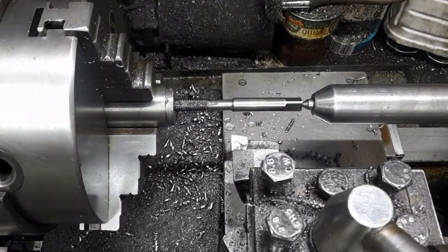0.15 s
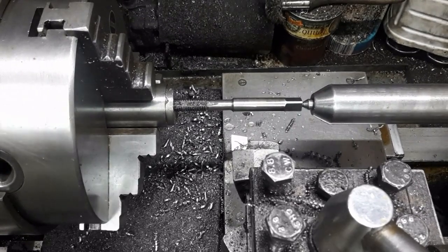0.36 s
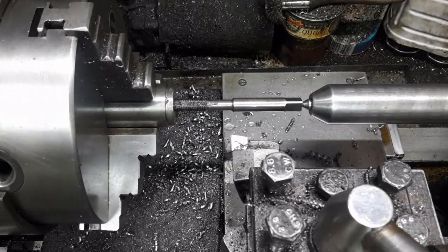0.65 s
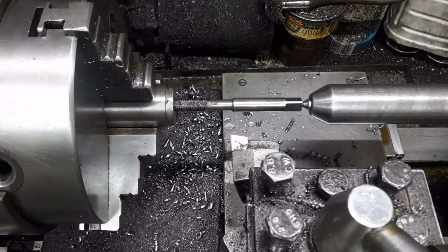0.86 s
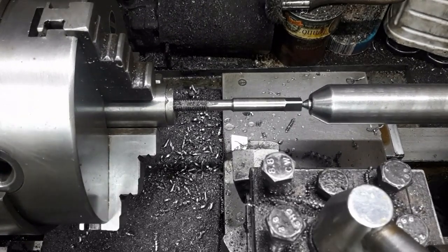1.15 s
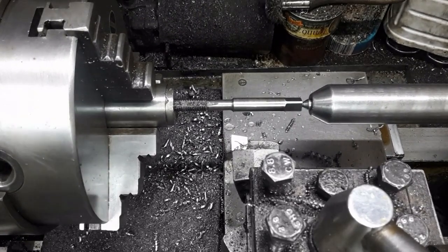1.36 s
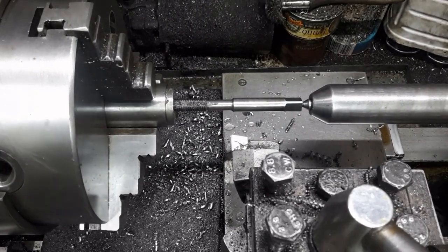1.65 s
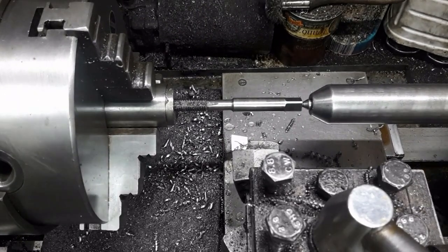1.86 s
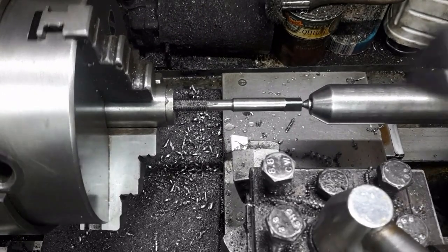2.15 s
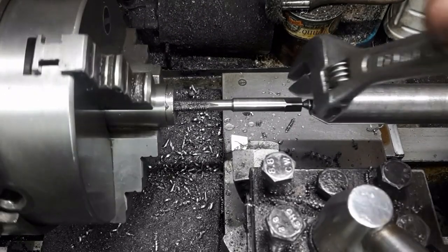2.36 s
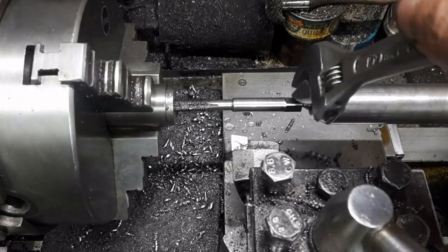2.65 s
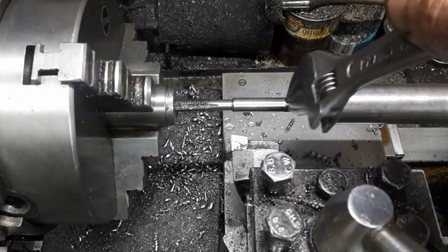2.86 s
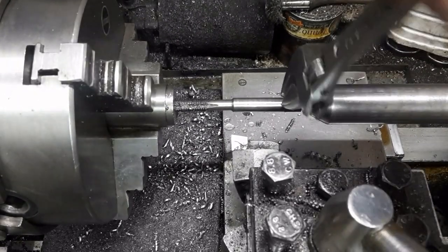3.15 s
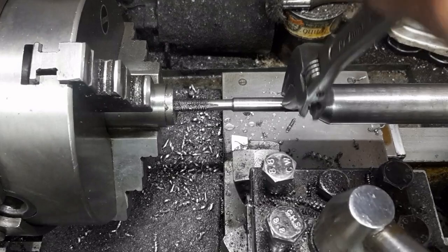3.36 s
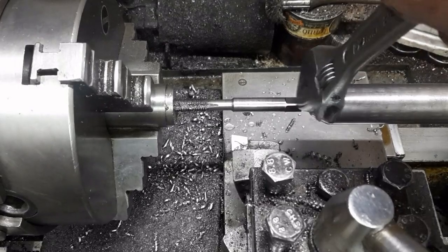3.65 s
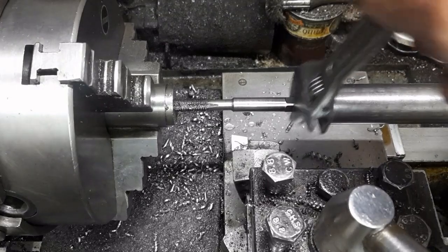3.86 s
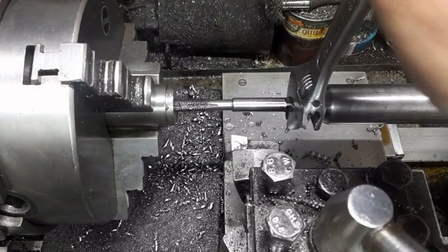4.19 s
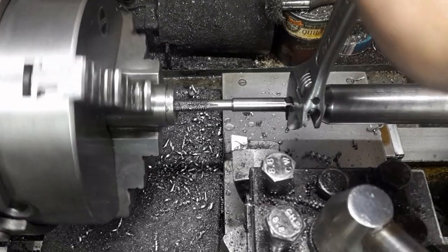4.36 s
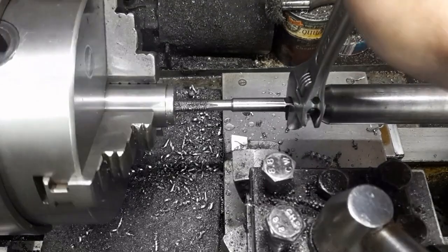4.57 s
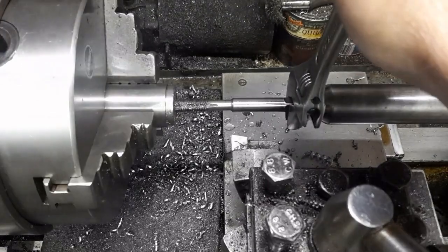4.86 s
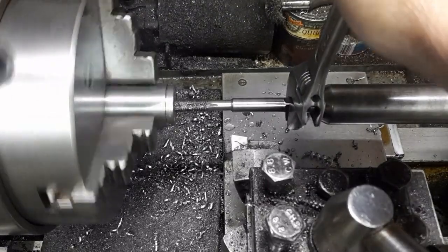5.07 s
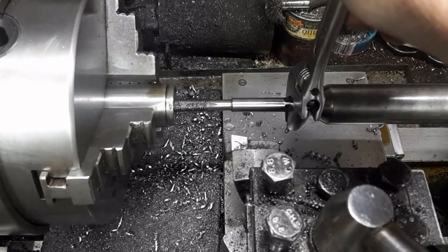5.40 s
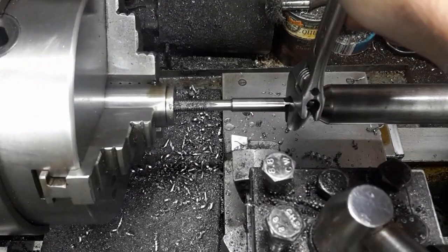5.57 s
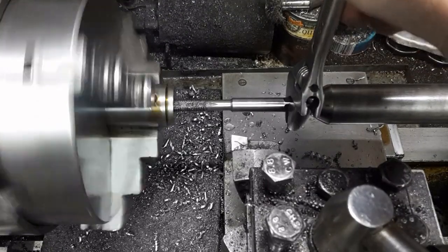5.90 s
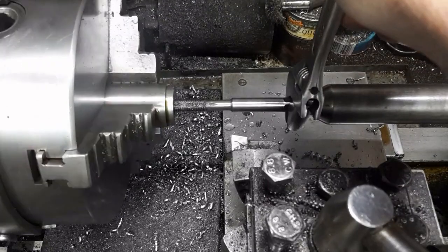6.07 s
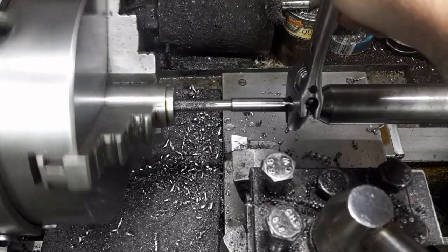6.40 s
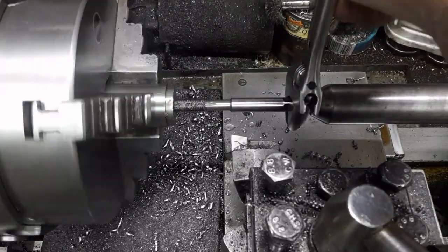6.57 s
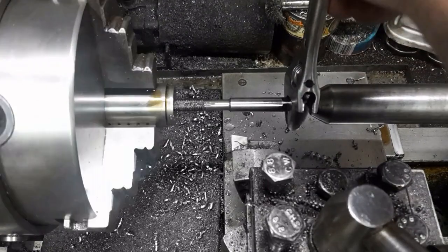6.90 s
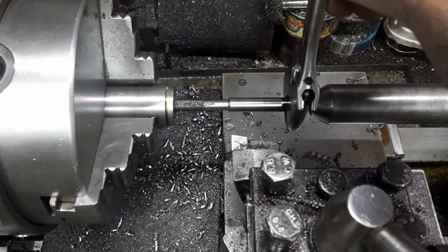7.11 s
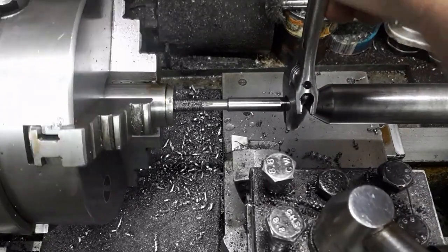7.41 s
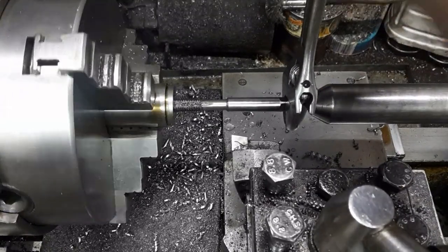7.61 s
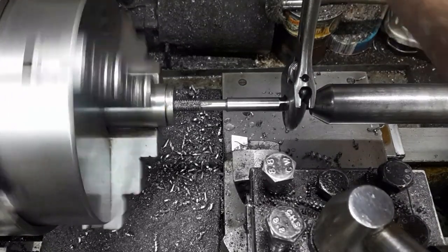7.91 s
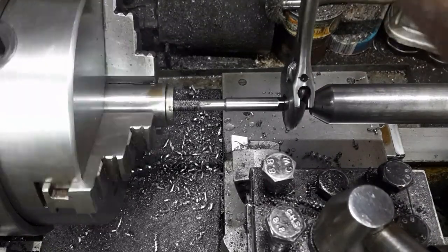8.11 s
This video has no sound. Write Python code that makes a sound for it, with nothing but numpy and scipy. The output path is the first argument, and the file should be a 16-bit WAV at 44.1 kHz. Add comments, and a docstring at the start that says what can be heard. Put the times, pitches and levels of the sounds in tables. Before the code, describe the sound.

A faint machine whirr sinks away, a wrench clinks and knocks onto steel, then rasping hand turns give way to a sped-up burst of swishes and ticks.

```python
"""In a workshop a thread is tapped by hand on a lathe, close to the microphone; most of the range leans left.
A whirr runs down, a wrench is fitted to the tap and knocks into place, then the chuck is pulled round by hand.
From 6.6 s time runs four times as fast: the pulls become quick swishes and ticks, higher in pitch.
Knocks are noise bursts in bands with ringing sine modes; whirr and squeal are noise in narrow resonances;
rasp, scrapes, hiss and room are coloured noise; groans, a faint low tone and hum are sine tones."""
import sys
import numpy as np
from scipy import signal
from scipy.fft import rfft, irfft
from scipy.io import wavfile
from scipy.ndimage import uniform_filter1d

SR = 44100
rng = np.random.default_rng(int(sys.argv[2]) if len(sys.argv) > 2 else 0)


def unload_wav(signal):
    """Save mono or channel-first audio to the path in sys.argv[1] as 16-bit WAV at rate SR, clipped to [-1, 1]."""
    wavfile.write(
        sys.argv[1],
        SR,
        np.round(np.clip(np.atleast_2d(signal).T, -1, 1) * 32767).astype(np.int16),
    )


N = 363825
TIME, BINS = np.arange(N) / SR, np.fft.rfftfreq(N, 1 / SR)  # s, Hz
FAST_FROM_S, FAST = 6.595, 4  # when time speeds up, and how many times
EDGE_HZ, SQUEAL_HZ = 16000, 3575  # top of the recorder's range; squeal at true speed

# Edges of the bass, middle, high and top band of a blow at true speed: [edge_hz]
BLOW_EDGES_HZ = [255, 850, 2000, 7500, 16500]
# Resonances of the chuck at true speed: [centre_hz, width_hz, lift_db]
CHUCK_RESONANCES = [(256, 25, 5.5), (890, 80, 7), (1533, 37, 11), (3420, 25, 7)]
# The drive running down: [time_s, pitch_hz, relative level_db]
RUN_DOWN = [(0, 1754, -51), (0.448, 1720, -49), (0.799, 1680, -50), (0.999, 1648, -56.5),
            (1.351, 1560, -57), (1.651, 1430, -55), (2.05, 1370, -61.5), (2.251, 1334, -72)]
# Likeness of left and right at true speed: [frequency_hz, correlation -1 to 1]
LIKENESS = [(60, 1), (150, 0.46), (300, 0.5), (700, 0.26), (1200, -0.42), (2500, 0.0081), (16000, 0)]


def wrench():
    """The wrench clinks, scrapes and knocks on the tap, and the chuck takes up its play."""
    # Light touches that set the tap ringing: [time_s, relative level_db, decay_s before the bass hold]
    clinks = [(1.6746, -35, 0.072), (1.7108, -43, 0.06), (1.7218, -42.5, 0.027), (2.6683, -56, .05),
              (2.7048, -51.5, 0.16), (2.9553, -51.5, 0.046)]
    # Knocks on the tap's square: [time_s, relative level_db, bass_db and middle_db against that level]
    knocks = [(2.6084, -39.5, -11, -13.5), (2.971, -44.5, -5, -19), (3.0391, -50, 5.5, -6),
              (3.1062, -35, -13, -13), (3.7973, -28, -9, -14), (4.005, -37, 4, -5), (4.0259, -37, -1, -8),
              (4.0297, -30.5, -13, -5), (4.6333, -39.5, -3.5, -8.5), (4.647, -45, -12, -5.5),
              (4.789, -49.5, -13, -14), (5.5792, -36.5, -14, -15)]
    # The chuck takes up its play: [time_s, relative level_db, bass_db against that level]
    clunks = [(5.1791, -42.5, -19), (5.3984, -47.5, -2.5), (5.884, -42.5, -21), (5.9647, -48, -20),
              (6.0923, -39, -3), (6.0984, -43, -25), (6.26, -51.5, -4)]
    # The wrench slides on the tap's square: [start_s, end_s, relative level_db]
    scrapes = [(.56, .6, -79), (1.55, 1.61, -55.5), (2.34, 2.39, -62), (2.615, 2.74, -56),
               (2.77, 2.82, -58.5), (2.93, 2.96, -56.5), (2.97, 3.07, -48), (3.06, 3.16, -54),
               (3.738, 3.8, -54), (3.955, 4.012, -54.5), (4.57, 4.63, -62)]
    # Colour of the scrape: [frequency_hz, relative level_db]
    scrape_colour = [(88, -43), (150, -8.5), (201, -17), (324, -9), (449, -11), (506, -15.5), (677, -9.5),
                     (1040, -21), (2100, -19), (2670, -20.5), (3450, -20.5), (5770, -24.5), (9000, -40),
                     (11700, -68), (19800, -120)]
    # Left minus right for the wrench: [frequency_hz, difference_db]
    wrench_sides = [(60, 1), (160, 15), (450, 5), (1200, 13.5), (2400, 10.5), (5500, 18), (7200, 14),
                    (9000, -6), (12000, -27), (16000, -14)]
    hard_db, brightening = -30, 3  # below a hard knock the top band loses this many dB per dB of force
    top_db, dull_db = -3, -17  # top band of a hard and of a soft knock

    blows = np.zeros((2, N))
    for s, db, t60 in clinks:
        add(blows, s + 0.00038, strike(db + np.array([-16, -14.0, -2.0, -21.5]), t60, ring_db=2))
    for s, db, bass_db, middle_db in knocks:
        knock_top_db = max(top_db + brightening * min(db - hard_db, 0), dull_db)
        bands_db = db + np.array([bass_db, middle_db, 0, knock_top_db])
        add(blows, s + .0005, strike(bands_db, t60=0.043, ring_db=-15))
    for s, db, bass_db in clunks:
        add(blows, s + 0.0006, strike(db + np.array([bass_db, 0, -7, -27]), t60=.036, ring_db=-3))
    scrape = evened(body(noise(scrape_colour, grit=0.37, grains_per_s=170), 1.0))
    scrape = scrape * strokes(scrapes, soft=0.32, swell_db=0)
    return ports(amp(25.0) * blows + amp(-1.5) * scrape, wrench_sides, LIKENESS)


def strike(bands_db, t60, ring_db):
    """Steel on steel: a blow with its low, middle, high and top band, and the ring of the tap."""
    knock = blow(bands_db, t60, 1, crack=2.3, rise=0.0012, room_db=-23, room_t60=0.16, bass_hold=200)
    return knock + amp(ring_db) * ring(bands_db)


def blow(bands_db, t60, speed, crack, rise, room_db, room_t60, bass_hold):
    """A crack, dense modes of heavy steel dying fast (bass slowest), and a room tail losing treble first."""
    t = np.arange(SR // 4 // speed) * speed / SR  # seconds at true speed
    sound = np.zeros((2, len(t)))
    for db, lo, hi in zip(bands_db, BLOW_EDGES_HZ, BLOW_EDGES_HZ[1:]):
        decay = max(t60, .01) * (1 + bass_hold / lo)
        modes = amp(-60 * t / decay)
        tail = amp(room_db - 60 * t / room_t60 * (0.5 + lo / 12000))
        shape = (crack * np.exp(-t / 0.00097) + modes + tail) * (1 - np.exp(-t / rise))
        band = signal.butter(6, [lo * speed, min(hi * speed, SR * .45)], "band", fs=SR, output="sos")
        burst = body(shape * rng.standard_normal((2, len(t))), speed, lo, hi)
        burst = signal.sosfilt(band, burst)
        sound += amp(db) * burst / np.linalg.norm(burst, axis=1, keepdims=True)
    return sound


def ring(bands_db):
    """The clear modes of tap and wrench, each as strong as the blow is in its band."""
    # Clear ring of the tap: [pitch_hz, level_db against the band, t60_s]
    steel_modes = [(2690, -3.5, 0.067), (3170, -1, 0.061), (3287, -5, 0.022), (5680, -6, 0.13),
                   (8400, -18, 0.12), (9500, -2, 0.025), (12300, -25, 0.055)]
    t = np.arange(SR // 4) / SR
    sound = np.zeros((2, len(t)))
    for hz, db, t60 in steel_modes:
        mode = amp(-60 * t / t60) * np.sin(2 * np.pi * (hz * t + rng.random((2, 1))))
        band_db = bands_db[np.searchsorted(BLOW_EDGES_HZ, hz) - 1]
        sound += amp(db + band_db) * mode / np.linalg.norm(mode[0])
    return sound


def body(x, speed, lo=0, hi=SR):
    """The heavy steel parts ring briefly at their resonances between lo and hi Hz of true speed."""
    # Wrench, chuck and lathe bed at true speed: [centre_hz, width_hz, added level_db against the input]
    resonances = [(328, 49, 6), (527, 70, 7.5), (670.4, 11.5, 6), (994, 400, 2.5), (1380, 19, 5.5),
                  (2635, 530, 2.5), (3450, 62, -14), (3730, 230, -1), (4310, 1150, -2), (5450, 89, 0),
                  (7150, 40, -23), (8700, 110, 21), (11450, 260, 15), (12100, 160, 6), (12740, 160, 18.5)]
    total = x
    for hz, width, db in resonances:
        if lo <= hz < min(hi, EDGE_HZ / speed):
            peak = signal.iirpeak(hz * speed, hz / width, fs=SR)
            total = total + amp(db) * signal.lfilter(*peak, x)
    return total


def chuck():
    """The tap rasps unevenly in the hole, the bearings rumble along, and the steel squeals on and off."""
    # Colour of the cutting rasp: [frequency_hz, relative level_db]
    rasp_colour = [(380, -24), (650, -2), (922, -2.5), (1250, -0.5), (1370, 0), (1730, -7), (2060, -3.5),
                   (4000, -3), (5200, -37), (8800, -120)]
    # Colour of the bearings: [frequency_hz, relative level_db]
    bearing_colour = [(110, -50), (180, -23), (269, 0.5), (446, -9.5), (534, -1), (605, -17), (750, -8.5),
                      (980, -32), (1650, -120)]
    effort = turning(axis=3) * flutter(depth_db=1.5, hz=29.8)
    rasp = amp(-2.5) * noise(rasp_colour, CHUCK_RESONANCES, grit=0.28, grains_per_s=200) * effort
    bearing = amp(-22) * noise(bearing_colour, CHUCK_RESONANCES) * effort ** 0.73
    squeal = amp(-2.0) * whistle(SQUEAL_HZ, width=54) * turning(axis=4) * flutter(depth_db=2.5, hz=25)
    return rasp + bearing + squeal


def turning(axis):
    """Gain from one column of the turns: each gathers speed, holds, and comes to rest."""
    # The chuck pulled round by hand: [start_s, end_s, then relative hiss_db, rasp_db, squeal_db]
    turns = [(4.517, 4.69, -65, -60, -80), (4.69, 4.907, -65, -66, -63), (4.952, 5.08, -53, -59.5, -56.5),
             (5.1, 5.334, -64, -65.5, -82), (5.329, 5.489, -55, -49, -64), (5.52, 5.837, -51, -59, -60),
             (5.967, 6.136, -50.5, -46.5, -57), (6.18, 6.49, -50.5, -61, -55),
             (6.532, 6.643, -51, -53.5, -61)]
    rise_s, fall_s = 0.062, 0.039
    gain = np.zeros(N)
    for row in turns:
        gather = (1 + np.tanh((TIME - row[0]) / rise_s)) / 2
        rest = (1 - np.tanh((TIME - row[1]) / fall_s)) / 2
        gain += amp(row[axis]) * gather * rest
    return gain


def fast_tapping():
    """Ticks as the play is taken up, swishes of the tap through the metal, and a groaning chuck."""
    # Knocks at high speed: [time_s, relative level_db, bass_db against that level]
    tick_times = [(6.7461, -35, -17), (6.8604, -42, -6), (7.084, -33.5, -17), (7.1254, -38.5, 2.5),
                  (7.166, -46, -4), (7.257, -35.5, -10), (7.3008, -30.5, -0.5), (7.3047, -40, 3),
                  (7.324, -43, -8), (7.339, -39, -8), (7.4233, -35.5, -15), (7.481, -38, -9),
                  (7.677, -37.5, -2), (7.6827, -39, -17), (7.7922, -34.5, -13), (7.8193, -37, -2.5),
                  (7.852, -43, -9), (7.963, -36.5, -8), (7.9977, -37, 4), (8.0023, -31, -5.5),
                  (8.1322, -34.5, -11), (8.1844, -35, -17)]
    # Quick pulls of the chuck: [start_s, end_s, relative level_db]
    quick_pulls = [(6.575, 6.67, -46), (6.74, 6.825, -47.5), (6.901, 6.986, -47.5), (7.094, 7.159, -45),
                   (7.264, 7.332, -42), (7.42, 7.5, -43.5), (7.615, 7.699, -46.5), (7.795, 7.875, -43),
                   (7.972, 8.039, -42), (8.137, 8.2, -41)]
    # Colour of a pull as heard: [frequency_hz, relative level_db]
    pull_colour = [(180, -21), (300, -6), (725, -15.5), (1010, -2), (2520, -9.5), (2790, -3), (3460, -7),
                   (4090, -5.5), (4590, -2), (5520, -5.5), (6000, -5), (7080, -8), (12300, -4),
                   (16000, -11.5)]
    # Colour of the room as heard: [frequency_hz, relative level_db]
    room_colour = [(35, -52), (60, -29), (217, 5.5), (323, 0.5), (389, 6), (480, -1.5), (593, -1),
                   (666, -2.5), (882, -3.5), (991, 0), (2410, -5), (3500, -10.5), (7230, -8.5),
                   (14200, -6.5), (16000, -1.5)]
    # Course of the room: [time_s, relative level_db]
    room_course = [(6.6, -53), (7.3, -52), (7.75, -55), (8.25, -57)]
    # Left minus right: [frequency_hz, difference_db]
    fast_sides = [(60, 0.5), (150, 1.2), (380, 2.5), (950, 5.9), (2380, 7.8), (5980, 11), (15000, 16)]
    # Likeness of left and right: [frequency_hz, correlation 0 to 1]
    fast_likeness = [(100, 0.97), (400, 0.83), (700, 0.15), (1100, 0.76), (2500, 0.14), (5000, 0),
                     (16000, 0.019)]
    return_after_s, return_s, return_db = 0.026, 0.061, -59  # between pulls the hand goes back softly

    ticks = np.zeros((2, N))
    for s, db, bass_db in tick_times:
        bands_db = db + np.array([bass_db, -1.5, 0.5])
        tick = blow(bands_db, 0.032, FAST, crack=0.7, rise=0.0021, room_db=-14.5, room_t60=0.12, bass_hold=240)
        add(ticks, s + 0.00031, tick)
    returns = []
    for _, end, _ in quick_pulls[:-1]:
        start = end + return_after_s
        returns.append((start, start + return_s, return_db))
    effort = strokes(list(quick_pulls) + returns, soft=0.91, swell_db=12.5)
    pulls = noise(pull_colour, CHUCK_RESONANCES, FAST, grit=0.47, grains_per_s=970)
    pulls = pulls * effort * flutter(depth_db=1.9, hz=200)
    groan = amp(-40) * whistle(1110, width=150) * effort ** .5 * flutter(depth_db=8, hz=15)
    room = amp(-2.0) * noise(room_colour, CHUCK_RESONANCES, FAST) * level(room_course)
    squeal = amp(-67) * whistle(SQUEAL_HZ * FAST, width=250) * flutter(depth_db=6, hz=25)
    return ports(amp(16.0) * ticks + pulls + groan + room + squeal, fast_sides, fast_likeness)


def groans():
    """Short groans, and a faint low tone near the end: sines unsteady in pitch, stronger on the left."""
    # Short groans and the faint low tone: [start_s, end_s, mean pitch_hz, relative level_db]
    tone_rows = [(2.689, 2.775, 286.6, -59), (2.958, 3.07, 324, -50), (3.108, 3.17, 333, -55),
                 (5.302, 5.543, 257, -59.5), (5.577, 5.682, 280, -51.5), (6.175, 6.334, 285, -63),
                 (6.831, 6.891, 1115, -55), (7.977, 8.267, 123.4, -73)]
    mix = np.zeros((1, N))
    for start, end, hz, db in tone_rows:
        count = max(round((end - start) * SR), 2)
        waver = evened(uniform_filter1d(rng.standard_normal(count), size=300))
        tone = np.sqrt(2) * np.sin(2 * np.pi * np.cumsum(hz * (1 + 0.095 * waver)) / SR)
        add(mix, start, amp(db) * tone * signal.windows.tukey(count, .8)[None])
    return mix * amp([[2.5], [-3]])  # left, right


def whirr():
    """A fuzzy whine sinks and breaks up into a rough rush; the housing adds its fixed resonances."""
    # Resonances of the housing: [centre_hz, width_hz, relative level_db]
    housing_rows = [(828, 48, -15), (2330, 20, -13), (2664, 230, -12.5), (3200, 45, -18)]
    s, hz, _ = np.transpose(RUN_DOWN)
    pitch = np.interp(TIME, s, hz)
    clear = np.clip(pitch / hz[0], 0, 1) ** 3  # the whine blurs as the speed falls
    whine = clear * whistle(pitch, width=106) + amp(-4.5) * whistle(.89 * pitch, width=380)
    housing = sum(amp(db) * whistle(f, width) for f, width, db in housing_rows)
    return amp(0.5) * running() * (whine * flutter(depth_db=0.84, hz=24) + clear * housing)


def running():
    """Gain of the drive until it stops."""
    return level(RUN_DOWN, axis=2) * (TIME < RUN_DOWN[-1][0])


def air():
    """Hiss swells and sinks along with the other sounds; fizz and rumble follow by about half in dB."""
    # Soft sliding while the wrench is brought into place: [start_s, end_s, relative level_db]
    slides = [(2.17, 2.95, -67.5), (2.9, 3.85, -65.5)]
    # Dull bumps through the lathe bed: [start_s, end_s, relative level_db]
    bumps = [(.52, .64, -56), (1.36, 1.5, -67), (3.785, 3.85, -61), (3.995, 4.08, -54.5), (5.35, 5.45, -62),
             (5.56, 5.68, -74), (6.27, 6.44, -71)]
    # Colours of hiss, fizz, rumble and steady room: [frequency_hz, relative level_db]
    hiss_colour = [(1180, -16.5), (2000, -6.5), (2170, -7.5), (2570, -5.5), (2810, -8), (3520, -7.5),
                   (3820, -8.5), (4530, 0.5), (5140, -2.5), (5720, -6.5), (7040, -8.5), (7790, -18.5),
                   (9000, -25), (11700, -92), (19800, -120)]
    fizz_colour = [(5000, -30), (8000, 1), (10000, -3), (15000, -0.5), (16000, -6)]
    rumble_colour = [(15, -51), (25, -16), (96, -0.5), (124, -6.5), (217, -7), (259, -4.5), (700, -14),
                     (808, -14), (996, -16.5), (1150, -17), (1500, -19), (2530, -120)]
    room_colour = [(18, -41.5), (30, -5), (63, 1), (107, -46), (126, -16), (247, -17), (1060, -15.5),
                   (4000, -18), (5200, -83), (8800, -120)]

    sliding = strokes(slides, soft=0.39, swell_db=-9.5)
    # a constant floor, then with the whirr, the sliding and the turns
    swell = amp(-74) + amp(2) * running() + sliding + turning(axis=2)
    hiss = amp(0.5) * noise(hiss_colour, [(4200, 240, 1), (7130, 210, 10.1)], grit=0.35)
    hiss = hiss * swell * flutter(depth_db=0.5, hz=13)
    note = amp(-6.5) * whistle(4500, width=380) * sliding  # narrow note of steel sliding on steel
    fizz = amp(-42) * noise(fizz_colour) * swell ** .44
    rumble_gain = amp(-35) * swell ** 0.5 * flutter(depth_db=1.13, hz=3.5)
    rumble_gain = rumble_gain + strokes(bumps, soft=1.0, swell_db=0)
    rumble = noise(rumble_colour, [(92, 5.8, 0.87)]) * rumble_gain
    return hiss + note + fizz + rumble + amp(-74) * noise(room_colour)


def hum(speed):
    """Mains hum and its overtones as steady sines, their pitch multiplied by speed."""
    # Mains hum: [pitch_hz before the speed factor, relative level_db]
    hum_tones = [(50, -76.5), (99.3, -77.5), (149.3, -75.5)]
    total = 0
    for hz, db in hum_tones:
        total = total + amp(db) * np.sqrt(2) * np.sin(2 * np.pi * (hz * speed * TIME + rng.random()))
    return total


def noise(spectrum, resonances=(), speed=1, grit=0., grains_per_s=500):
    """Two unrelated noises with a share of sharp grains, coloured by a spectrum and its resonances."""
    smooth = rng.standard_normal((2, N))
    grains = smooth[::-1] * (rng.random((2, N)) < grains_per_s / SR)
    drive = smooth + grit * evened(grains)
    db = read(spectrum)
    for hz, width, lift in resonances:
        db = db + lift / (1 + (2 * (BINS / speed - hz) / width) ** 2)
    return evened(irfft(rfft(drive) * amp(db), N))


def whistle(hz, width):
    """Noise in one steep resonance that may move."""
    r = np.exp(-np.pi * width / SR)
    phase = 2 * np.pi * np.cumsum(np.broadcast_to(hz, N)) / SR
    # two slow noises carried up to the pitch
    a, b = signal.lfilter([1], [1, -2 * r, r * r], rng.random((2, 2, N)) - .5)
    return evened(a * np.cos(phase) + b * np.sin(phase))


def strokes(rows, soft, swell_db):
    """Gain of a row of strokes: each changes by swell_db, with soft ends over a share of its length."""
    gain = np.zeros((1, N))
    for start, end, db in rows:
        u = np.linspace(-.5, .5, max(round((end - start) * SR), 2))
        add(gain, start, amp(db + swell_db * u) * signal.windows.tukey(len(u), soft)[None])
    return gain


def flutter(depth_db, hz):
    """An uneven gain that wanders at rates up to about hz."""
    z = rfft(rng.standard_normal(N)) / (1 + (BINS / hz) ** 4)
    return evened(amp(depth_db * evened(irfft(z, N))))


def ports(pair, sides, same):
    """Two microphone ports: likeness and level difference vary with pitch, their mean keeping its power."""
    a, b = rfft(pair)
    c, tilt = np.clip(read(same), -1, 1), amp(read(sides) / 2)
    mean = np.sqrt(tilt ** 2 + tilt ** -2 + 2 * c + 1e-6) / 2
    left = a * tilt
    right = (c * a + np.sqrt(1 - c ** 2) * b) / tilt
    return irfft(np.array([left, right]) / mean, N)


def amp(db):
    """Decibels to gain."""
    return 10 ** (np.asarray(db) / 20)


def evened(x):
    """Scales to an rms of one."""
    return x / np.sqrt(np.mean(x ** 2) + 1e-20)


def read(points):
    """A table over log frequency, read at every bin."""
    hz, value = np.transpose(points)
    return np.interp(np.log(BINS + 1), np.log(hz + 1), value)


def level(rows, axis=1):
    """Gain over time from a dB column."""
    rows = np.array(rows)
    return amp(np.interp(TIME, rows[:, 0], rows[:, axis]))


def add(mix, s, sound):
    """Adds a sound into the mix at time s."""
    part = mix[:, round(s * SR):][:, :sound.shape[1]]
    part += sound[:, :part.shape[1]]


def scene():
    """True speed first, then four times as fast."""
    # Left minus right for whirr, chuck and air: [frequency_hz, difference_db]
    air_sides = [(60, 2.0), (95, 1.7), (150, 2.4), (240, 4.5), (380, 4.8), (600, 6.5), (950, 8.5),
                 (1500, 11.1), (2380, 10.8), (3770, 17.3), (5980, 20.0), (9470, 0.9), (15000, -5.0)]
    slow = ports(whirr() + chuck() + air(), air_sides, LIKENESS) + wrench() + amp(-7.0) * hum(0.99)
    fast = fast_tapping() + amp(-3.5) * hum(FAST)
    return np.where(TIME < FAST_FROM_S, slow, fast) + groans()


def record(dry):
    """The recorder's band limit: a steep low-pass."""
    lowpass = signal.firwin(301, EDGE_HZ, window=("kaiser", 8), fs=SR)
    return signal.oaconvolve(dry, lowpass[None], "same")


dry = scene()
out = record(dry)
unload_wav(out)
```